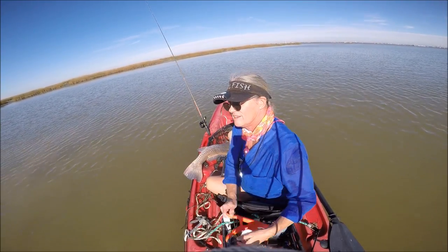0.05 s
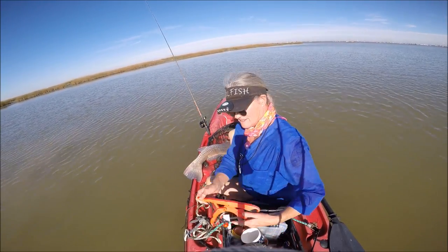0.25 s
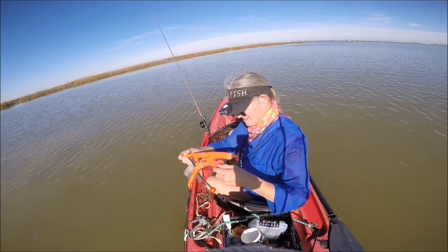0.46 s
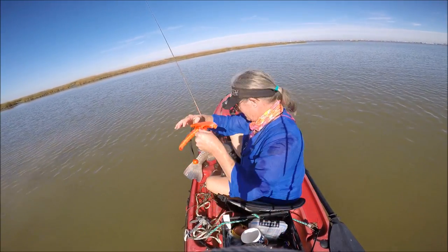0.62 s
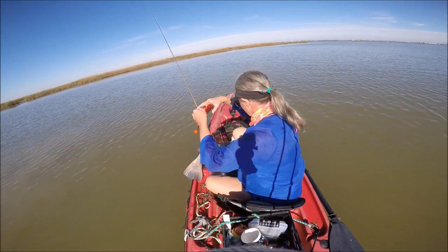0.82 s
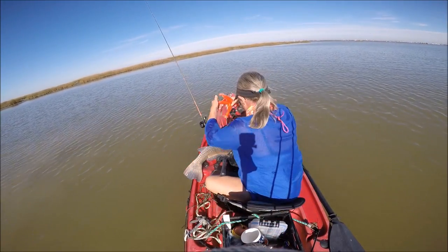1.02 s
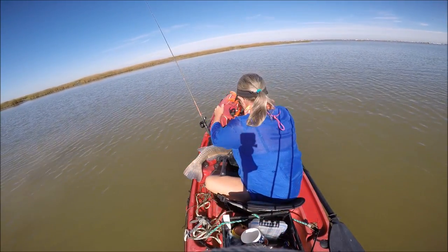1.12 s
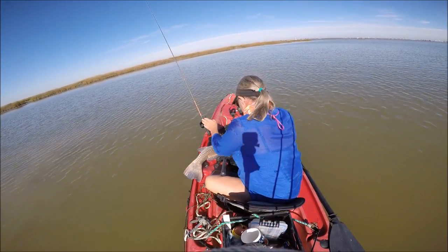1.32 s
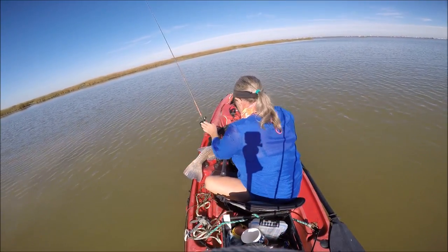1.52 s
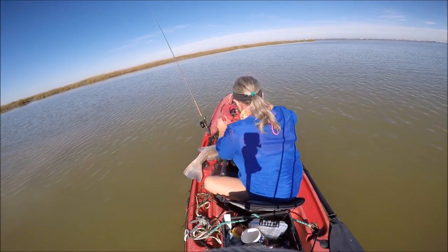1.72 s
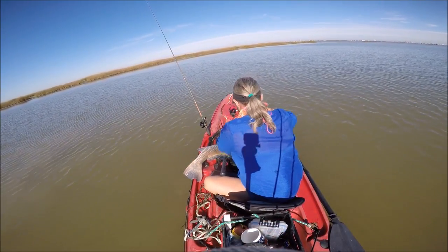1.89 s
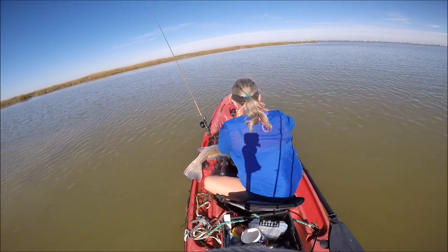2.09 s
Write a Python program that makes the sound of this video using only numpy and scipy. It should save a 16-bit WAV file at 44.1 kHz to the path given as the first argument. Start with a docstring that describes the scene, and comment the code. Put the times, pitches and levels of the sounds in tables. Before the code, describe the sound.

Plastic gear scuffs, rattles and knocks twice against a kayak's deck, making the hollow hull boom and overloading the close microphone. Three light taps follow, then dull thumps and scuffs, over low wind rumble outdoors.

```python
"""Low wind rumble and a faint hiss, with scuffs and rattles as plastic gear is lifted off a kayak's deck. The
gear knocks twice against the deck, hard enough to clip the recorder, and the hollow hull booms. Later come
three light taps, with dull thumps and scuffs as weight shifts in the boat on calm water. A thin electrical
whine and a high pulsing sit far underneath."""
import sys
import numpy as np
from scipy import signal
from scipy.fft import rfft, irfft
from scipy.io import wavfile

SR = 44100
rng = np.random.default_rng(int(sys.argv[2]) if len(sys.argv) > 2 else 0)


def materialize(psi):
    """Save the field psi as 16-bit PCM at rate SR to the path in sys.argv[1].

    A 1-D psi becomes a single channel; in a 2-D psi each row is a channel.
    """
    bounded = np.clip(np.atleast_2d(psi).T, -1, 1)
    quanta = np.round(bounded * 32767).astype(np.int16)
    wavfile.write(sys.argv[1], SR, quanta)


N = 94815
T = np.arange(N) / SR


def from_db(db):
    """Decibels to gain."""
    return 10 ** (np.asarray(db) / 20)


def fader(points):
    """Gain ride through (time_s, level_db) points."""
    return from_db(np.interp(T, *np.transpose(points)))


def noise(spectrum):
    """Noise of rms 1, coloured by (freq_hz, level_db) points and rolled off below the first."""
    hz, db = np.transpose(spectrum)
    freqs = np.maximum(np.fft.rfftfreq(N, 1 / SR), 1)
    colour = from_db(np.interp(np.log(freqs), np.log(hz), db))
    low_cut = np.minimum(freqs / hz[0], 1) ** 2
    shaped = irfft(rfft(rng.standard_normal(N)) * colour * low_cut, N)
    return shaped / shaped.std()


def burst(start_s, attack_s, t60_s):
    """Envelope that rises smoothly, then falls 60 dB in t60_s."""
    age = np.maximum(T - start_s, 0)
    rise = np.sin(np.pi / 2 * np.minimum(age / attack_s, 1)) ** 2
    return rise * np.exp(-np.log(1000) * np.maximum(age - attack_s, 0) / t60_s)


def mode(start_s, hz, attack_s, t60_s):
    """One resonance: a dying sine."""
    return burst(start_s, attack_s, t60_s) * np.sin(2 * np.pi * hz * (T - start_s))


def strike(contacts, modes, attack_s):
    """Each contact rings all modes; softer hits are duller, and the spot struck shifts the pitch."""
    out = np.zeros(N)
    for start_s, db, brightness_hz, pitch_ratio, *_ in contacts:
        for k, (hz, mode_db, t60_s) in enumerate(modes):
            scatter_db = 0.5 * rng.standard_normal()
            gain = from_db(db + mode_db + scatter_db) / np.hypot(1, (hz / brightness_hz) ** 2)
            out += (-1) ** k * gain * mode(start_s, hz * pitch_ratio, attack_s, t60_s)
    return out


# Fader rides of the wind and the hiss: time_s, level_db
WIND_RIDE = [(0, -26.5), (0.3, -30), (0.5, -39), (0.6, -35.5), (0.92, -40.5), (1.08, -34.5), (1.3, -35),
             (1.56, -36.5), (1.7, -34), (2.14, -29)]
HISS_RIDE = [(0, -63), (0.14, -60), (0.25, -71.5), (0.4, -70), (0.7, -65.5), (1.2, -65.5), (2.14, -65.5)]
# Their colours, one deep and one airy: freq_hz, level_db
WIND_EQ = [(20, -4), (40, 0), (62, 3), (88, -12.5), (110, -5), (135, -18.5), (190, -34), (320, -32.5),
           (600, -40.5), (1200, -50.5), (3000, -79.5)]
HISS_EQ = [(200, -4), (1000, 1.5), (2500, 1), (4400, -1.5), (5400, -2), (6400, -5.5), (9000, -8.5),
           (15000, -11.5)]


def wind_and_hiss():
    """The bed: wind rumble swells and sinks under a faint hiss."""
    return fader(WIND_RIDE) * noise(WIND_EQ) + fader(HISS_RIDE) * noise(HISS_EQ)


# Thin electrical tones: pitch_hz, rms_db
WHINE_TONES = [(5034, -80), (10046, -83.5), (10071, -89)]


def whine():
    """A faint electrical whine of steady high sines."""
    return sum(from_db(db) * np.sqrt(2) * np.sin(2 * np.pi * hz * T) for hz, db in WHINE_TONES)


# Narrow treble band of the pulsing: freq_hz, level_db
PULSING_EQ = [(5000, -44.5), (5380, -1.5), (5500, 0), (5620, -4), (6000, -48)]


def high_pulsing(level_db=-75, rate_hz=18):
    """A barely audible band of noise flutters evenly."""
    return from_db(level_db) * np.sin(np.pi * rate_hz * T) ** 2 * noise(PULSING_EQ)


# Rubs against the hull: start_s, level_db, attack_s, t60_s, brightness_hz
SCUFF_CUES = [(0.015, -38.5, 0.032, 0.5, 2100), (0.078, -35, .002, 0.15, 1500),
              (0.096, -38, .006, 0.28, 440), (0.117, -31.5, .002, 0.25, 1530),
              (0.337, -39.5, .002, 0.028, 698), (1.016, -39, 0.0033, 0.13, 546),
              (1.038, -39, 0.0038, 0.21, 650), (1.211, -40.5, 0.0019, 0.079, 802),
              (1.323, -47.5, 0.019, 0.19, 1504), (1.606, -39.5, 0.0081, 0.15, 1427),
              (1.71, -36.5, .002, 0.056, 3000), (1.722, -39.5, 0.0048, 0.1, 3000),
              (1.785, -44.5, 0.01, 0.38, 595), (1.848, -39.5, 0.0071, 0.11, 880),
              (1.9513, -37.5, 0.0085, 0.053, 1400), (2.006, -35, .002, 0.033, 2940),
              (2.033, -36, 0.0013, 0.052, 3070), (2.08, -72, .01, 0.15, 710)]
# Their boxy colour: freq_hz, level_db
SCUFF_EQ = [(90, 1), (160, 10), (230, -4), (330, 6), (460, -2), (700, -11.5), (880, -17), (1130, -6.5),
            (1500, -30.5), (2500, -30), (8000, -45)]


def scuffs():
    """Gear and seat rub the hull: bursts of friction noise, each with its own low-pass."""
    friction = noise(SCUFF_EQ)
    out = np.zeros(N)
    for start_s, db, attack_s, t60_s, brightness_hz in SCUFF_CUES:
        low_pass = signal.butter(2, brightness_hz, fs=SR, output="sos")
        out += from_db(db) * burst(start_s, attack_s, t60_s) * signal.sosfilt(low_pass, friction)
    return out


# Thumps through the hull: start_s, level_db, pitch_hz, attack_s, t60_s
THUMP_CUES = [(0.032, -22.5, 74, 0.0037, 0.067), (0.066, -13, 64, 0.0082, 0.063),
              (0.095, -7, 52.5, .014, 0.25), (0.1445, 0.5, 59.3, 0.0045, 0.17),
              (0.219, -16.5, 105.3, .006, .09), (0.2369, -8, 64.1, 0.0096, 0.46),
              (0.469, -32, 66, 0.046, 0.21), (1.021, -27, 67.1, 0.0084, 0.18),
              (1.076, -19, 50.7, 0.013, .11), (1.226, -21.5, 52.4, 0.0079, 0.13),
              (1.307, -24, 45.2, .02, 0.25), (1.618, -10.5, 42.6, 0.02, 0.25),
              (1.701, -14, 48.2, 0.017, 0.48), (1.824, -14, 71, 0.0073, 0.026),
              (1.85, -18, 59.4, 0.018, 0.074), (1.907, -27, 51.6, 0.0079, 0.033),
              (1.952, -17.5, 68.6, 0.0032, 0.2), (2.0, -17, 58.5, 0.0061, 0.099),
              (2.079, -20, 54.76, 0.062, 0.74)]
# Overtones, relative to each thump: pitch_ratio, level_db, t60_ratio
THUMP_OVERTONES = [(1.729, -15, .6), (2.5, -17.5, 0.55)]


def hull_thumps():
    """The hollow hull booms: a low fundamental with two shorter overtones."""
    out = np.zeros(N)
    for start_s, db, hz, attack_s, t60_s in THUMP_CUES:
        out += from_db(db) * mode(start_s, hz, attack_s, t60_s)
        for pitch_ratio, overtone_db, t60_ratio in THUMP_OVERTONES:
            out += from_db(db + overtone_db) * mode(start_s, hz * pitch_ratio, attack_s, t60_s * t60_ratio)
    return out


# Small ticks of the gear: start_s, level_db
RATTLE_CUES = [(0.080, -58), (0.094, -51), (0.116, -45.5), (0.136, -50), (0.176, -57.5), (0.284, -60.5)]
# Their bright colour: freq_hz, level_db
RATTLE_EQ = [(1500, -7), (2500, -6), (3600, 6.5), (5500, -9.5), (9000, -14), (15000, -26.5)]


def rattles():
    """The gear rattles as it is picked up: tiny bursts of bright noise."""
    envelope = sum(from_db(db) * burst(start_s, attack_s=0.0033, t60_s=0.021)
                   for start_s, db in RATTLE_CUES)
    return envelope * noise(RATTLE_EQ)


# Gear hits the deck in two clusters: start_s, level_db, brightness_hz, pitch_ratio, crack_db
KNOCK_CUES = [(0.1493, 1.5, 3500, .975, -24), (0.1525, -1.5, 3500, .975, -21),
              (0.2153, -8.5, 1400, 1.02, -43), (0.2217, 2.5, 3000, 1.02, -26.5),
              (0.2317, -10.5, 1780, 1.02, -48.5)]
# Ringing body of a knock: pitch_hz, level_db, t60_s
KNOCK_BODY = [(329, -25.5, .06), (407.3, -23, 0.15), (465, -16.5, 0.079), (685.5, -16.5, 0.04),
              (825, -18, 0.066), (1029.3, -3, .026), (1089, -1.5, .028), (1490, -42, 0.027),
              (1546, -25.5, 0.039), (1910, -24, .022), (2018, -18, .022), (2640, -39, 0.0088),
              (3360, -35.5, .02), (3460, -39.5, 0.028)]
# Colours of the crack and of the hull wall's wash: freq_hz, level_db
CRACK_EQ = [(300, 13.5), (1000, 5), (1400, -6.5), (2000, 2), (2350, -6.5), (2540, 2), (2900, -8), (3240, 2),
            (3900, -9), (4450, -13), (5500, -16), (7500, -19), (10000, -32), (15000, -29.5)]
WALL_EQ = [(110, 3), (170, 4), (250, -3.5), (420, 2), (700, -12), (880, -15), (1100, -19), (1400, -25.5),
           (3000, -49.5), (8000, -66.5)]


def knocks(wall_db=-16.5):
    """Hard plastic on the deck: a crack, a ringing body and a wash of many weak hull-wall modes."""
    crack_envelope, wall_envelope = np.zeros((2, N))
    for start_s, db, _, _, crack_db in KNOCK_CUES:
        crack_envelope += from_db(crack_db) * burst(start_s, attack_s=0.0013, t60_s=0.032)
        wall_envelope += from_db(db + wall_db) * burst(start_s, attack_s=0.0046, t60_s=0.0811)
    crack = crack_envelope * noise(CRACK_EQ)
    wash = wall_envelope * noise(WALL_EQ)
    return crack + strike(KNOCK_CUES, KNOCK_BODY, attack_s=0.0013) + wash


# Faint ringing tails: start_s, pitch_hz, level_db, t60_s
RING_CUES = [(0.221, 1866, -42, 0.15), (0.388, 837, -62, 1.7)]


def lingering_rings():
    """Two quiet pure tones hang on after the second knock."""
    return sum(from_db(db) * mode(start_s, hz, attack_s=0.0055, t60_s=t60_s)
               for start_s, hz, db, t60_s in RING_CUES)


# Three light touches: start_s, level_db, brightness_hz, pitch_ratio
TAP_CUES = [(1.1199, -27, 2700, 1.02), (1.2088, -32, 2240, 1.013), (1.428, -33, 1620, 0.984)]
# Ringing body of a tap: pitch_hz, level_db, t60_s
TAP_BODY = [(383, -7.5, 0.042), (540, -10, 0.059), (703, -8.5, 0.028), (1103, -4, 0.026),
            (1582, -5.5, 0.019), (1940, -20.5, 0.017), (3740, -18, 0.0079)]
# Colour of its click: freq_hz, level_db
CLICK_EQ = [(300, -6), (550, -9), (880, -7), (1150, 10), (1700, -3), (2100, -20), (2600, -34), (3900, -20),
            (5000, -43)]


def taps(click_db=-15.5):
    """Gear touches the boat lightly: a dull click and a short ring."""
    click_envelope = sum(from_db(db + click_db) * burst(start_s, attack_s=0.00075, t60_s=0.037)
                         for start_s, db, *_ in TAP_CUES)
    return click_envelope * noise(CLICK_EQ) + strike(TAP_CUES, TAP_BODY, attack_s=0.00042)


def scene():
    """Everything mixed in mono, at one microphone on the stern."""
    bed = wind_and_hiss() + whine() + high_pulsing()
    boat = scuffs() + hull_thumps() + rattles() + knocks() + lingering_rings() + taps()
    return (bed + boat)[None]


def record(dry):
    """The recorder clips the loudest peaks softly; a steep low-pass trims the top."""
    ceiling, stopband_hz = 0.98, 15800
    clipped = dry / (1 + (dry / ceiling) ** 8) ** (1 / 8)
    low_pass = signal.cheby2(16, 60, stopband_hz, fs=SR, output="sos")
    return signal.sosfilt(low_pass, clipped)


dry = scene()
out = record(dry)
materialize(out)
```